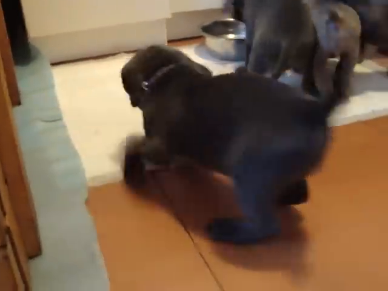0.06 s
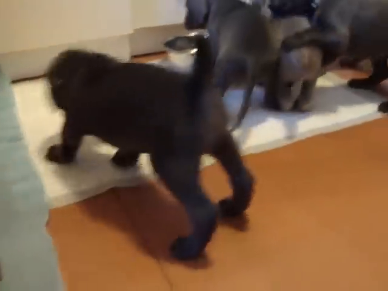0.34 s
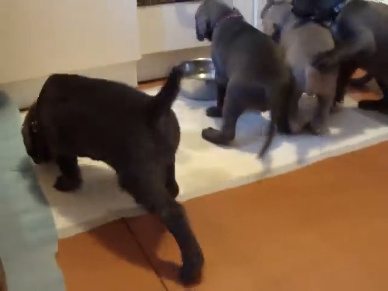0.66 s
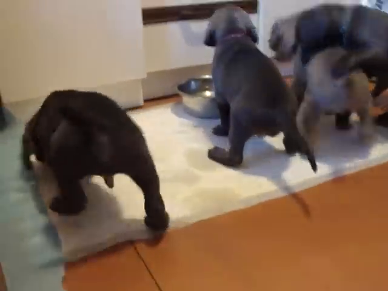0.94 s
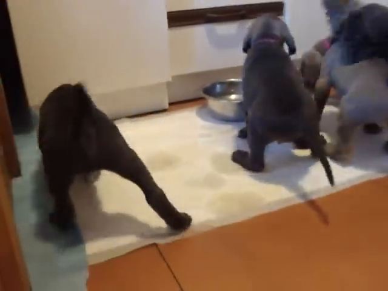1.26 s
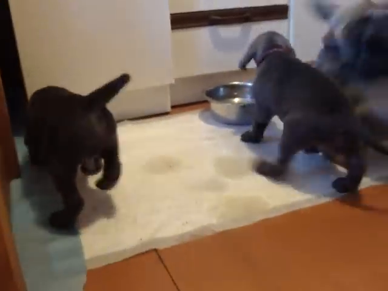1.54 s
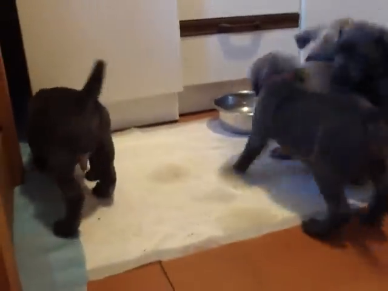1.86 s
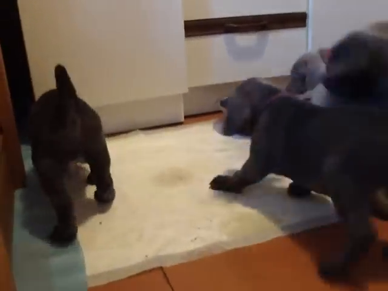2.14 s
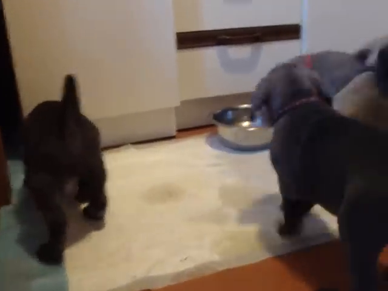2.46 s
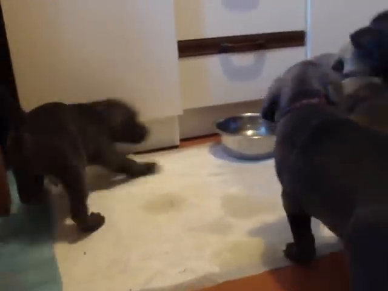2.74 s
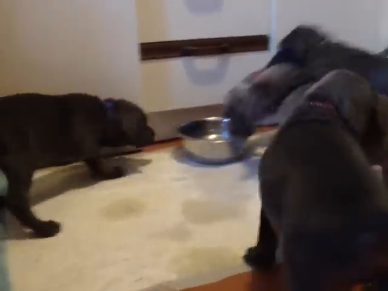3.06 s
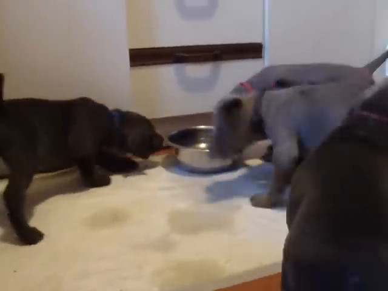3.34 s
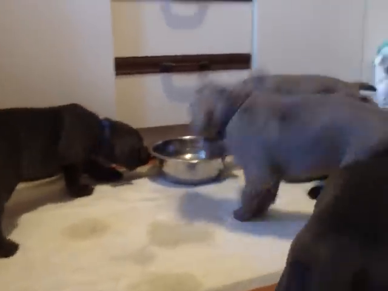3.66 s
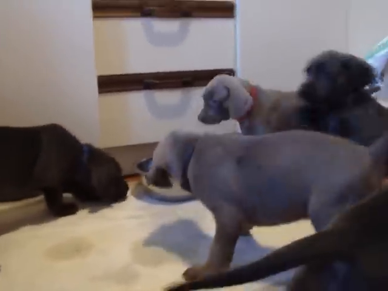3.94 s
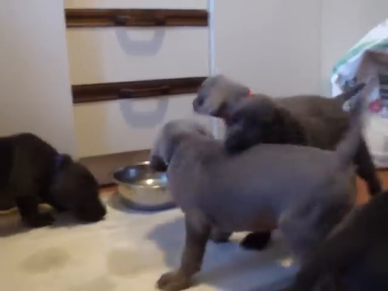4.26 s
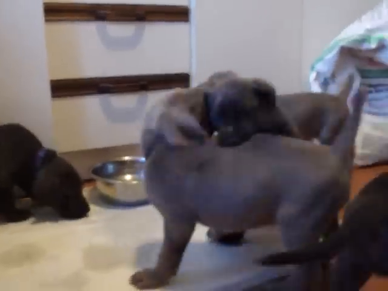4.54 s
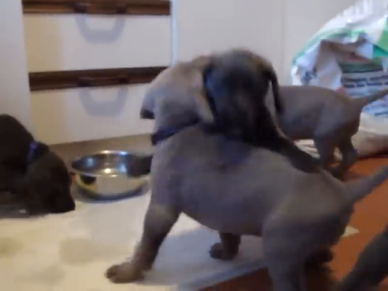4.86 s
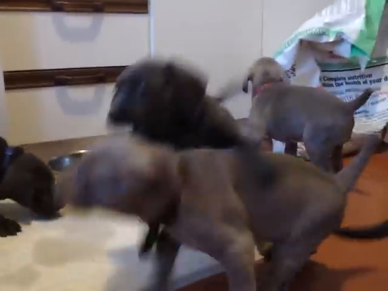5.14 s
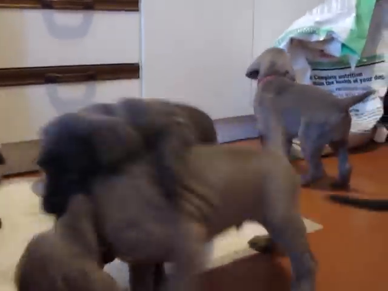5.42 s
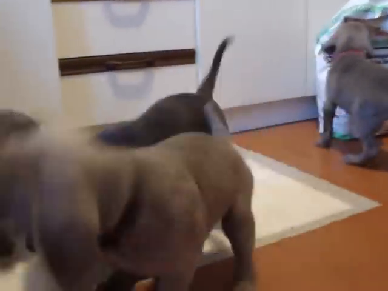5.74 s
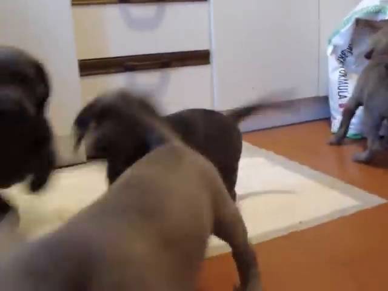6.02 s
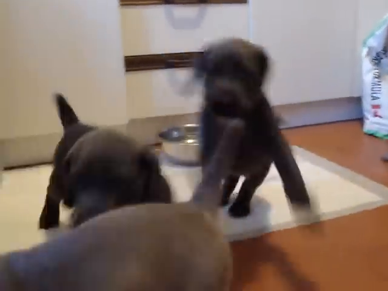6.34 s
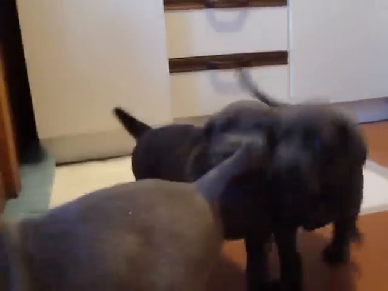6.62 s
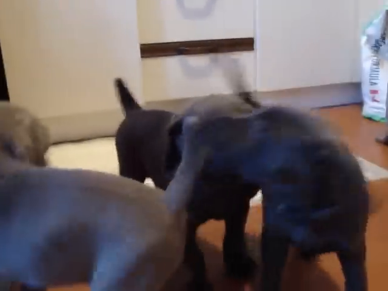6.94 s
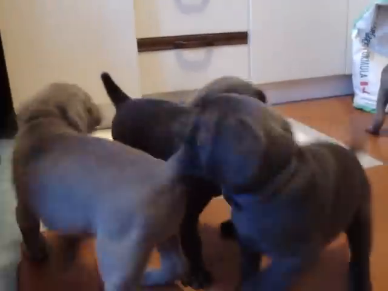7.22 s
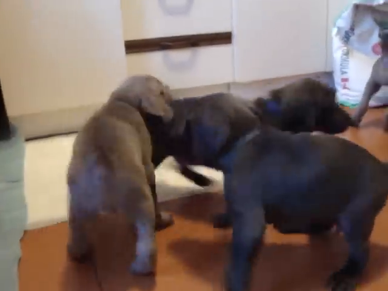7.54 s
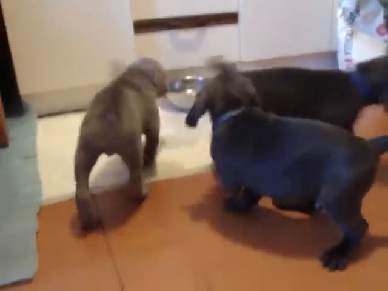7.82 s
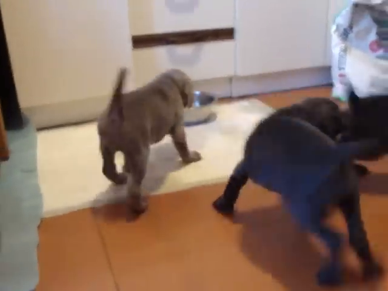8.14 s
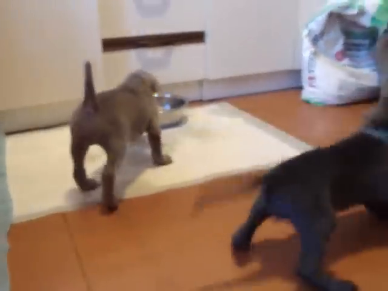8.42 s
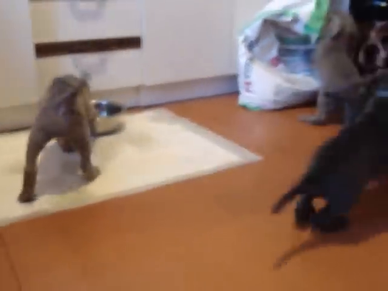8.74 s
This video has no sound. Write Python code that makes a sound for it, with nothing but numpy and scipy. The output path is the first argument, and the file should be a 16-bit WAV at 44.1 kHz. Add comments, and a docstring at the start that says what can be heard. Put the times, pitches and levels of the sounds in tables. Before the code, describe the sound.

Paws pad and scuff irregularly across tile and a mat as several puppies mill about nearby, with sharp little claw clicks throughout. Something is bumped twice early on and again a moment later, clattering further away. Light clinks come from a metal bowl every couple of seconds, and the scampering thickens past the middle, all in a small, slightly echoing kitchen.

```python
"""Puppies on a kitchen floor

A litter of puppies jostles on a tiled floor with a mat on it. Soft paws slap down and make
the floor thump, claws tick, and feet and coats scuff along. Small metal things clink now and
then, and something is bumped and clatters further off. The hard little room echoes, and the
house rumbles faintly underneath."""
import sys
import numpy as np
from scipy import signal
from scipy.fft import rfft, irfft, next_fast_len
from scipy.io import wavfile
from scipy.ndimage import map_coordinates

SR = 44100
rng = np.random.default_rng(int(sys.argv[2]) if len(sys.argv) > 2 else 0)


def log_audio(samples):
    """Write samples as a 16-bit WAV file to the path given in sys.argv[1]."""
    # one column per channel
    frames = np.atleast_2d(samples).T
    # limit to full scale, then quantise
    limited = np.clip(frames, -1, 1)
    pcm = np.round(limited * 32767).astype(np.int16)
    wavfile.write(sys.argv[1], SR, pcm)


N = 396013  # about 9 seconds


def amp(db):
    """Turn decibels into a number to multiply by."""
    return 10 ** (np.asarray(db) / 20)


def unit(x):
    """Scale a sound so its average strength (rms) is 1."""
    return x / np.sqrt(np.mean(x ** 2) + 1e-20)


def along(points, hz):
    """Read between the rows of a (Hz, value) table, spacing frequencies by octaves."""
    freqs, values = np.transpose(points)
    return np.interp(np.log(hz + 1), np.log(freqs + 1), values)


def filtered(x, response):
    """Turn each frequency up or down by the gain that response(hz) gives."""
    size = next_fast_len(len(x) + 4096)
    return irfft(rfft(x, size) * response(np.fft.rfftfreq(size, 1 / SR)), size)[:len(x)]


def coloured(x, tone):
    """Shape a sound with a (Hz, dB) tone table, then set its strength to 1."""
    return unit(filtered(x, lambda hz: amp(along(tone, hz))))


def add(track, at, sound):
    """Mix a sound into the track, starting at a time in seconds."""
    start = max(round(at * SR), 0)
    part = track[start:start + len(sound)]
    part += sound[:len(part)]


def seconds(length):
    """The time of every sample in a sound of this length."""
    return np.arange(int(length * SR)) / SR


def fade(t, fade_s):
    """Die away. A fade time is how long a sound takes to drop by 60 dB."""
    return amp(-60 * t / fade_s)


def press(t, contact_s):
    """A soft contact: swells to 1 at the contact time, then lets go."""
    return (t / contact_s) ** 2 * np.exp(2 - 2 * t / contact_s)


def grainy(per_s, depth_db):
    """Noise whose strength jumps at random many times a second: tiny catches and slips."""
    jumps = rng.standard_normal(int(N * per_s / SR) + 4)
    grip = np.clip(map_coordinates(jumps, [np.arange(N) * per_s / SR], order=1), -2, 2)
    return rng.standard_normal(N) * amp(depth_db * grip)


# The tone of the house's rumble. Each row: frequency in Hz, level in dB.
HOUSE_TONE = [(20, -8), (60, 5), (120, 3), (300, -28), (2000, -39)]


def house_rumble():
    """The house makes a faint, steady, low noise."""
    return amp(-66) * coloured(rng.standard_normal(N), HOUSE_TONE)


# How long the kitchen rings. Each row: frequency in Hz, fade time in seconds.
ROOM_FADES = [(120, 0.23), (400, 0.29), (1000, 0.49), (3000, 0.32), (7000, 0.31), (11000, 0.19)]


def kitchen_echo(x):
    """Quick echoes and a fading tail, new every quarter second as the puppies move about."""
    out, hop = np.zeros(N), SR // 4
    for start in range(0, N, hop):
        piece = x[start:start + hop]
        hz, t, bands = signal.stft(rng.standard_normal(SR * 3 // 4), SR, nperseg=256)
        bands = bands * fade(t, along(ROOM_FADES, hz)[:, None])
        tail = signal.istft(bands, SR, nperseg=256)[1]
        add(out, start / SR + .005, signal.fftconvolve(piece, tail / np.linalg.norm(tail)))
        for delay_s in rng.uniform(.001, .006, size=3):  # off the floor and cupboard doors
            add(out, start / SR + delay_s, 0.29 * piece)
    return out


# How busy the litter is. Each row: time in seconds, level of padding feet in dB, level of rustle in dB.
BUSTLE = [(0.0, -44.5, -45.5), (0.55, -47, -49.5), (1.35, -49, -49), (1.55, -29, -38), (2.03, -45, -49.5),
          (2.55, -48, -45.5), (3.18, -42.5, -40.5), (3.33, -45, -46.5), (3.8, -38, -38), (4.05, -47, -48),
          (4.32, -41.5, -46.5), (5.25, -48, -47.5), (6.38, -44.5, -42.5), (7.43, -46.5, -48.5),
          (8.25, -44.5, -42), (8.43, -34.5, -40.5), (8.65, -50, -43), (8.98, -41, -46.5)]
# The tones of padding feet and rustling coats. Each row: frequency in Hz, level in dB.
PADDING_TONE = [(25, -29), (60, -12), (110, -13), (160, -2.5), (300, -3.5), (480, 1), (900, 0.5),
                (1500, -4), (2500, -9), (6000, -23)]
RUSTLE_TONE = [(500, -10), (1800, -3), (3600, 4.5), (6500, 1), (9000, -2.5), (11000, -7.5)]


def milling():
    """Many faint steps and brushing coats blur into an uneven background."""
    times, padding_db, rustle_db = np.transpose(BUSTLE)
    t = np.arange(N) / SR
    padding = coloured(grainy(per_s=55, depth_db=2.6), PADDING_TONE)
    rustle = coloured(grainy(per_s=260, depth_db=3.0), RUSTLE_TONE)
    return (amp(np.interp(t, times, padding_db) - .5) * padding
            + amp(np.interp(t, times, rustle_db) - 2) * rustle)


def faint_steps():
    """Make rows for light paw steps and the claw tick after each, louder when the litter is busy."""
    times, padding_db, _ = np.transpose(BUSTLE)
    steps_per_s, pitch_spread = 6, 0.2
    steps, ticks = [], []
    for i, (late, soft_paw, soft_claw, paw_pitch, claw_pitch) in enumerate(rng.standard_normal((200, 5))):
        at = (i + late / 2) / steps_per_s
        if 0 < at < N / SR:
            slap_db = np.interp(at, times, padding_db) + 9 - 0.5 * soft_paw
            tick_db = slap_db - 10 - 0.5 * soft_claw
            steps.append((at, slap_db, 930 * np.exp(pitch_spread * paw_pitch), slap_db - 2))
            ticks.append((at + 0.022, tick_db, 4700 * np.exp(pitch_spread * claw_pitch)))
    return steps, ticks


# The tone of one body rubbing on another. Each row: frequency in Hz, level in dB.
RUB_TONE = [(60, -32), (120, 0), (170, -3), (260, -10), (600, -32)]


def body_rub(start_s=4.7, length_s=0.4):
    """One puppy clambers over another: a low rub that swells and fades."""
    swell = np.zeros(N)
    add(swell, start_s, np.sin(np.pi * seconds(length_s) / length_s))
    return amp(-45.5) * swell * coloured(rng.standard_normal(N), RUB_TONE)


# Bumps further off. Each row: start in seconds, level in dB, fade time in seconds, treble limit in Hz.
FAR_BUMPS = [(1.374, -22, 0.42, 6900), (1.666, -27.5, 0.73, 6500), (3.12, -23, 0.51, 5100),
             (5.846, -32, 0.12, 2970), (7.088, -34, 0.23, 2820), (7.849, -31, 0.067, 3980),
             (8.269, -33, 0.18, 5000)]
# The tone of their clatter. Each row: frequency in Hz, level in dB.
CLATTER_TONE = [(50, -35), (160, -10), (300, -2.5), (550, -5), (1040, 6), (1700, 2), (2500, 1.5), (4500, 0),
                (11000, -2)]
# A bumped panel's hum. Each row: start in seconds, pitch in Hz, level in dB, fade time in seconds.
PANEL_HUM = [(3.12, 361, -35, 1.14)]


def bumps():
    """Each bump sets off a dense clatter that dies away; after one, a panel hums on."""
    out, t = np.zeros(N), seconds(0.51)
    for at, db, fade_s, limit_hz in FAR_BUMPS:
        clatter = coloured(rng.standard_normal(len(t)), CLATTER_TONE)
        clatter = unit(filtered(clatter, lambda f: 1 / np.sqrt(1 + (f / limit_hz) ** 7)))
        rise = 1 - np.exp(-t / 0.00089)
        add(out, at, amp(db + 2) * rise * fade(t, fade_s) * clatter)
    t = seconds(1)
    for at, hz, db, fade_s in PANEL_HUM:
        rise = 1 - np.exp(-t / 0.0041)
        add(out, at, amp(db) * rise * fade(t, fade_s) * np.sin(2 * np.pi * hz * t))
    return out


# Light touches on metal. Each row: start in seconds, level in dB.
METAL_TOUCHES = [(2.624, -28.5), (2.906, -26), (2.914, -15.5), (4.858, -26), (4.8596, -9.5), (5.77, -21),
                 (6.937, -28), (6.9835, -25), (6.9864, -13), (7.089, -30), (7.539, -24.5), (7.666, -33),
                 (8.761, -34)]
# The tone of the metal's many crowded notes. Each row: frequency in Hz, level in dB.
METAL_TONE = [(2200, -34), (3800, -17), (4600, -25), (5400, -13), (5800, 0), (6200, 1), (6450, -9),
              (6850, -4), (7500, -13), (8400, -14), (9000, -23), (11000, -22)]


def clinks():
    """Each touch is a tiny rattle on the metal: a bright chink, hushed at once by fur and floor."""
    out, t = np.zeros(N), seconds(0.098)
    rattle = press(t, 0.0012) + 0.052 * fade(t, 0.16)
    for at, db in METAL_TOUCHES:
        chink = coloured(rattle * rng.standard_normal(len(t)), METAL_TONE)
        add(out, at - .001, amp(db - 19.5) * chink)
    return out


# Sliding strokes. Each row: rough start and length in seconds, level in dB, brightness in dB.
# Brightness turns the hiss up and the drag down.
SLIDES = [(0.169, 0.034, -41.5, 7), (0.812, 0.045, -38.5, -2), (1.115, 0.08, -49.5, -2.5),
          (1.33, 0.047, -34, -1.5), (1.365, 0.021, -32.5, -4.5), (1.399, 0.082, -33.5, -9.5),
          (1.501, 0.027, -35, -6), (1.66, 0.025, -26.5, -6.5), (1.697, 0.075, -33, -5),
          (1.946, 0.073, -50, 6.5), (2.025, 0.057, -46, -1.5), (2.229, 0.04, -45.5, -6),
          (2.746, 0.037, -35.5, -1), (3.008, 0.026, -34.5, 2), (3.32, 0.068, -45, -0.5),
          (3.75, 0.16, -51.5, 7), (4.199, 0.058, -41.5, -5), (4.345, 0.074, -42, -5.5),
          (4.434, 0.11, -46.5, -1.5), (5.22, 0.2, -46, -0.5), (5.642, 0.097, -44.5, 1),
          (5.804, 0.045, -36, -5.5), (5.84, 0.032, -33.5, -11), (5.878, 0.061, -39.5, -4.5),
          (6.17, 0.1, -47, 6), (6.499, 0.057, -36, -0.5), (6.581, 0.05, -40, 0), (6.839, 0.057, -39, -3),
          (7.242, 0.043, -51, 7), (7.375, 0.034, -42.5, -4.5), (7.738, 0.091, -47, 5.5),
          (7.869, 0.1, -46.5, -2), (8.264, 0.037, -32.5, -4.5), (8.292, 0.074, -39, -5.5),
          (8.548, 0.09, -42, -4)]
# The tones of a slide's three parts. Each row: frequency in Hz, level in dB.
DRAG_TONE = [(40, -26), (110, -7), (170, 1.5), (320, 8), (700, 12), (1200, 5.5), (1800, 3), (4000, -63)]
RASP_TONE = [(600, -15), (1500, 0), (2500, -2), (4300, -3.5), (6000, -12), (11000, -41)]
HISS_TONE = [(2500, -28), (5000, -3.5), (6500, -5.5), (8500, -6), (11000, -11.5)]


def scuffs():
    """Sliding feet and coats catch and slip: a dull drag, a gritty rasp and a fine hiss."""
    drag, rasp, hiss = np.zeros((3, N))
    for at, length, db, bright_db in SLIDES:
        t = seconds(1.34 * length)
        stroke = np.abs(np.sin(np.pi * t / t[-1]))
        for track, part_db in ((drag, db - bright_db), (rasp, db + 2.5), (hiss, db + bright_db + 3)):
            add(track, at - length / 4, amp(part_db) * stroke)
    return (drag * coloured(grainy(per_s=170, depth_db=2.1), DRAG_TONE)
            + rasp * coloured(grainy(per_s=350, depth_db=4.2), RASP_TONE)
            + hiss * coloured(grainy(per_s=350, depth_db=3.6), HISS_TONE))


# Clear claw ticks and other hard taps. Each row: start in seconds, level in dB, pitch in Hz.
CLAW_TICKS = [(0.1513, -32, 4180), (0.7174, -37, 7000), (1.378, -11.5, 4260), (1.5406, -22, 3020),
              (1.6194, -22, 4000), (1.667, -19, 3880), (1.6722, -15, 3700), (1.7372, -21, 4500),
              (2.0265, -33, 6420), (2.4936, -34.5, 6700), (2.7132, -26, 6760), (2.7255, -27, 6900),
              (3.6798, -29, 3200), (3.959, -32.5, 4770), (4.1612, -35.5, 4300), (4.345, -31, 2900),
              (4.3621, -30, 4000), (4.3888, -29.5, 3000), (4.8076, -25.5, 2760), (5.2101, -26.5, 2400),
              (5.2678, -31, 6200), (5.3007, -26.5, 5570), (5.3382, -31, 4540), (5.6733, -34, 3500),
              (5.805, -25, 2360), (5.8417, -25, 2170), (5.852, -33, 2900), (6.066, -28, 5650),
              (6.0958, -35, 5300), (6.1165, -26, 7300), (6.3177, -26, 5150), (6.3767, -33, 1890),
              (6.414, -23.5, 6430), (6.5736, -28.5, 3700), (6.5832, -22, 8200), (6.819, -32, 7000),
              (6.9395, -26, 6000), (7.0338, -29, 5440), (7.23, -36, 6000), (7.2864, -26.5, 4260),
              (7.483, -36.5, 6500), (7.5978, -28.5, 2600), (7.6993, -30, 3600), (7.851, -28.5, 2200),
              (8.2704, -23, 3500), (8.3288, -22.5, 4220), (8.523, -27, 3930), (8.5737, -31, 5200)]


def claws(faint_ticks):
    """Claws hit tile: each tick, clear or faint, is one sharp snap and a short burst of grit."""
    out, t = np.zeros(N), seconds(0.045)
    grit_fade = fade(t, 0.019) + 0.1 * fade(t, 0.2)
    for at, db, hz in list(CLAW_TICKS) + faint_ticks:
        snap = np.sin(2 * np.pi * hz * t) * np.exp(-1.33 * hz * t)  # gone in a few cycles
        noise = rng.standard_normal(len(t))
        grit = unit(filtered(noise, lambda f: 1 / (1 + (0.66 * (f / hz - hz / (f + 1))) ** 2)))
        add(out, at, amp(db + 14) * snap + amp(db - 0.5) * grit * grit_fade)
    return out


def thump(t, hz, contact_s, rough):
    """A soft hit: a short note that sags in pitch, trailed by a patter of noise around that pitch."""
    sagging_hz = hz * (0.805 + 0.29 * np.exp(-t / contact_s / 2))
    phase = 2 * np.pi * np.cumsum(sagging_hz) / SR
    band = lambda f: f ** 3 / (f ** 3 + (0.82 * hz) ** 3) / (1 + (f / (1.54 * hz)) ** 4)
    patter = unit(filtered(rng.standard_normal(len(t)), band))
    note = press(t, contact_s) * np.sin(phase + rng.uniform(0, 2 * np.pi))
    return note + rough * press(t, 2.05 * contact_s) ** 0.51 * patter


# The floor's low notes. Each row: pitch in Hz, level in dB, fade time in seconds.
FLOOR_NOTES = [(158, -16.5, 0.14), (232, -0.5, .042), (325, -7.5, 0.051)]


def footfall(slap_db, hz, thud_db):
    """The pad slaps down, the floor gives a hollow knock, and the puppy's weight rings its low notes."""
    t = seconds(.12)
    contact_s = 1.38 / hz  # lower-pitched steps last longer
    spot = np.exp(0.077 * rng.standard_normal(len(FLOOR_NOTES) + 1))  # each spot rings a bit differently
    thud = np.zeros(len(t))
    for (note_hz, db, fade_s), detune in zip(FLOOR_NOTES, spot):
        phase = 2 * np.pi * note_hz * detune * t + rng.uniform(0, 2 * np.pi)
        thud += amp(db) * fade(t, fade_s) * np.sin(phase)
    thud *= (1 - np.exp(-t / 0.0024)) ** 2  # a soft start
    slap = thump(t, hz, 0.9 * contact_s, rough=0.29)
    knock = thump(t, 471.6 * spot[-1], 0.0014 + contact_s, rough=0.099)
    knock_db = -9 + 0.51 * slap_db + 0.23 * thud_db  # grows with both slap and thud
    return amp(slap_db - 2.5) * slap + amp(knock_db) * knock + amp(thud_db + 5.5) * thud


# Clear paw steps. Each row: start in seconds, slap level in dB, slap pitch in Hz, thud level in dB.
PAW_STEPS = [(0.039, -29, 675, -35), (0.119, -25.5, 900, -19.5), (0.311, -27, 774, -36.5),
             (0.75, -25.5, 716, -38), (0.8504, -10.5, 1000, -20.5), (1.345, -30, 800, -23),
             (1.380, -22, 1205, -16), (1.4585, -18, 1010, -22), (1.666, -6, 1140, -33),
             (1.681, -15, 880, -46), (2.164, -36, 700, -41), (2.222, -20.5, 890, -34),
             (2.3415, -34, 900, -35.5), (2.958, -26, 840, -50), (3.477, -33, 900, -36),
             (3.577, -11.5, 680, -27.5), (3.593, -17, 750, -53), (3.894, -29, 890, -31),
             (4.035, -27.5, 615, -40), (4.210, -19, 1080, -47), (4.24, -15, 533, -33),
             (4.488, -27, 850, -41), (4.534, -25, 776, -44), (4.774, -29, 1070, -31),
             (4.863, -23.5, 580, -39), (5.2098, -9.5, 667, -35), (5.338, -23.5, 1000, -36),
             (5.646, -26, 664, -37), (5.670, -24, 715, -33.5), (5.780, -15.5, 666, -43),
             (5.841, -15, 1280, -29), (5.8487, -5, 780, -15.5), (5.884, -18, 930, -25),
             (5.933, -15, 479, -26.5), (6.0685, -24.5, 825, -22), (6.263, -24.5, 860, -26),
             (6.320, -17, 790, -19), (6.378, -15.5, 1100, -23.5), (6.4185, -15.5, 870, -41),
             (6.5735, -18, 1010, -28.5), (6.7955, -19, 960, -24.5), (6.846, -26, 1100, -32),
             (6.8726, -20, 720, -34), (6.905, -14, 910, -41), (7.018, -22, 705, -39),
             (7.036, -21.5, 1010, -34), (7.2877, -8.5, 620, -30), (7.377, -21, 660, -46),
             (7.449, -31, 855, -31.5), (7.598, -20, 1010, -20.5), (7.6376, -25.5, 850, -32),
             (7.704, -29, 496, -23), (7.985, -21.5, 804, -38), (8.203, -25.5, 880, -36),
             (8.276, -29, 900, -23), (8.344, -29, 1030, -26.5), (8.441, -24, 700, -29),
             (8.511, -12.5, 453, -39), (8.5196, -11, 520, -37), (8.8127, -20.5, 686, -32),
             (8.899, -20, 750, -36)]


def paws(light_steps):
    """Paws land on the floor: one footfall for every step, clear or light."""
    out = np.zeros(N)
    for at, slap_db, hz, thud_db in list(PAW_STEPS) + light_steps:
        add(out, at - .0003, footfall(slap_db, hz, thud_db))
    return out


def scene():
    """Mix the puppies, clinks and bumps, each with its own share of echo, over the background."""
    house = house_rumble()
    bustle = milling() + body_rub()
    metal, slides, clatter = clinks(), scuffs(), bumps()
    light_steps, light_ticks = faint_steps()
    feet, ticks = paws(light_steps), claws(light_ticks)
    echo = kitchen_echo(amp(-7) * (feet + metal) + amp(-8) * (ticks + slides) + amp(-14) * clatter)
    return (feet + ticks + metal + slides + clatter + echo + bustle + house)[None]


def record(dry):
    """Thin the deep bass, gently limit the loudest peaks and cut the highest treble."""
    bass_hz, top_hz, ceiling = 95, 11150, 0.75
    thin = filtered(dry[0], lambda hz: hz ** 2 / np.hypot(hz ** 2, bass_hz ** 2) * 0.91 + 0.065)
    limited = thin / (1 + np.abs(thin / ceiling) ** 4) ** .25
    return filtered(limited, lambda hz: 1 / (1 + (hz / top_hz) ** 200))[None]


dry = scene()
out = record(dry)
log_audio(out)
```